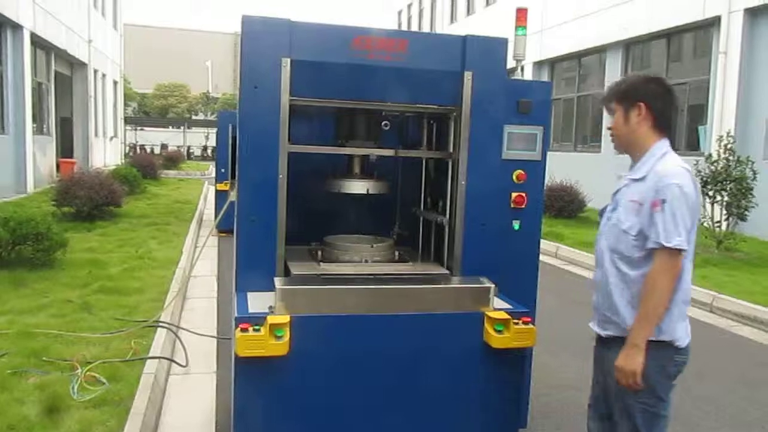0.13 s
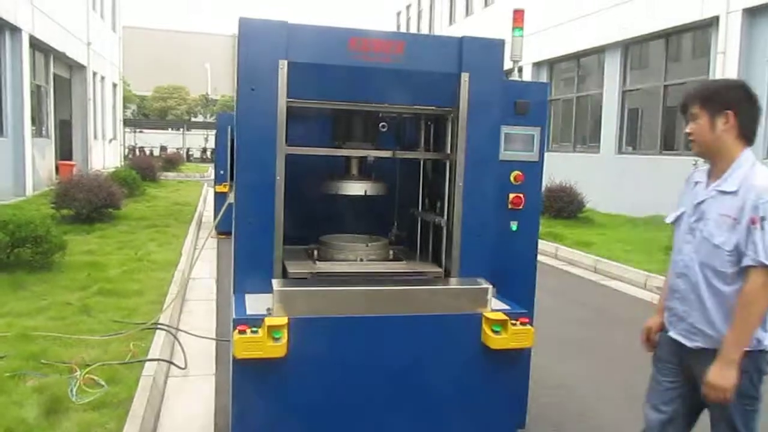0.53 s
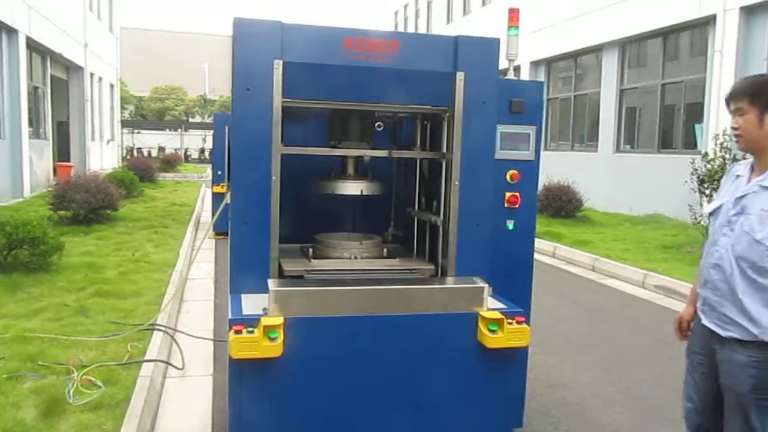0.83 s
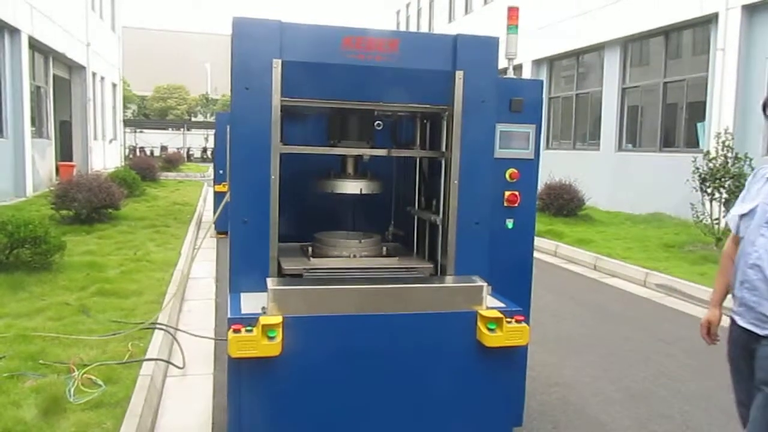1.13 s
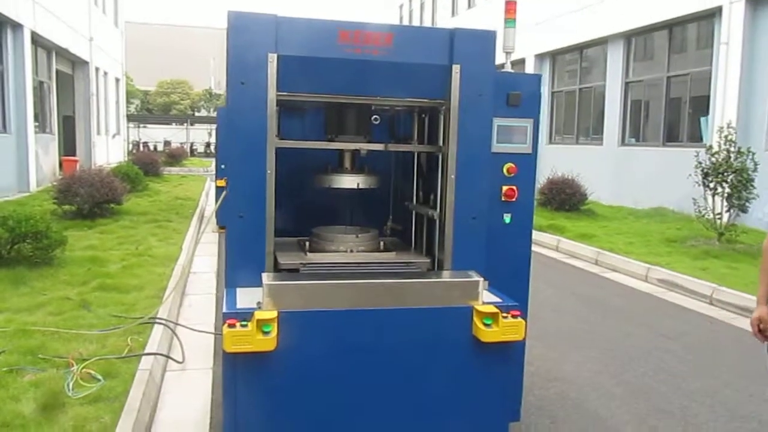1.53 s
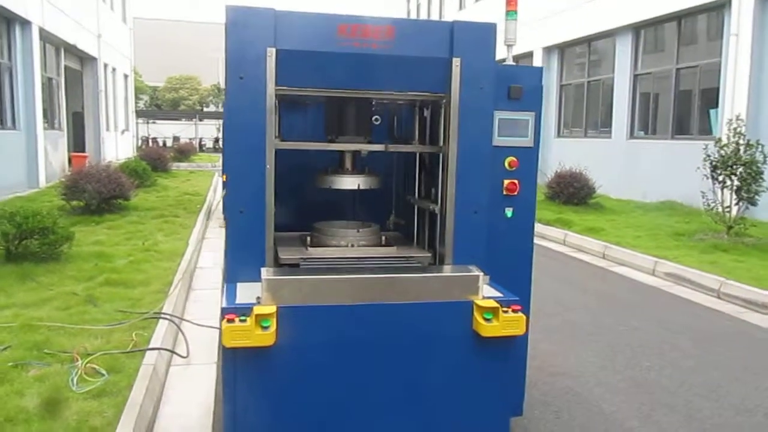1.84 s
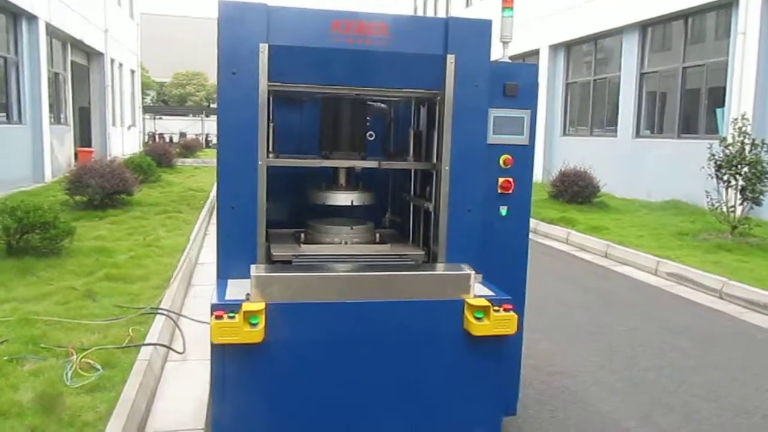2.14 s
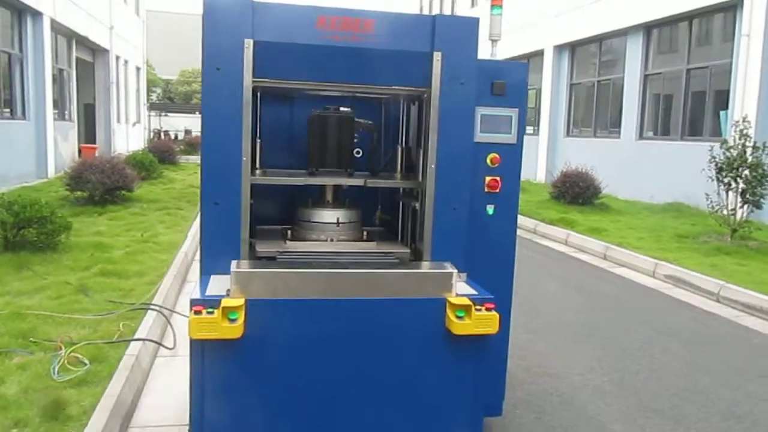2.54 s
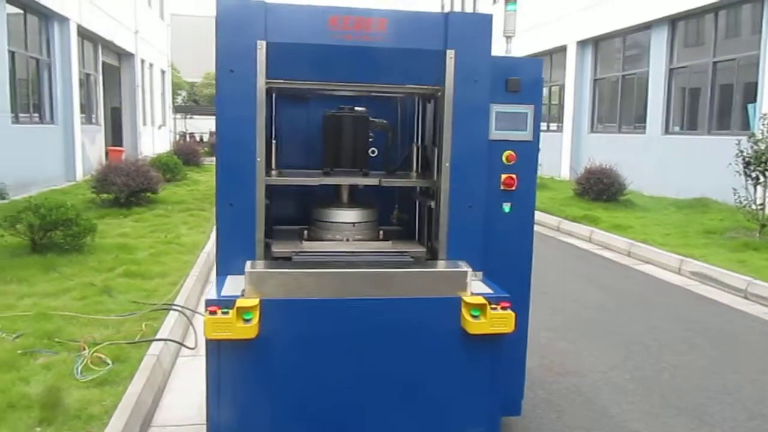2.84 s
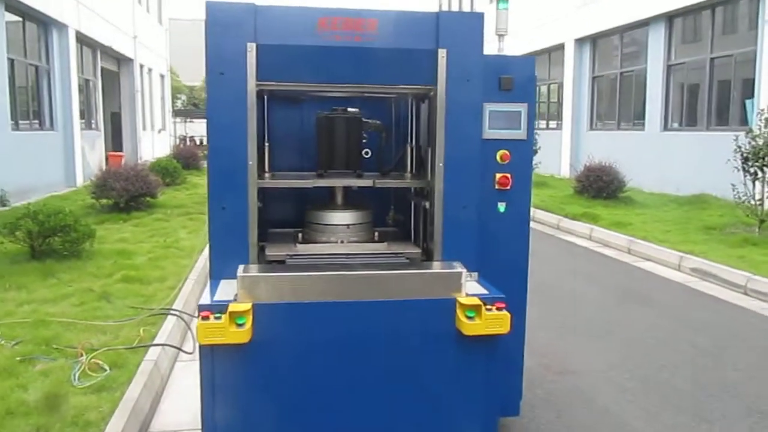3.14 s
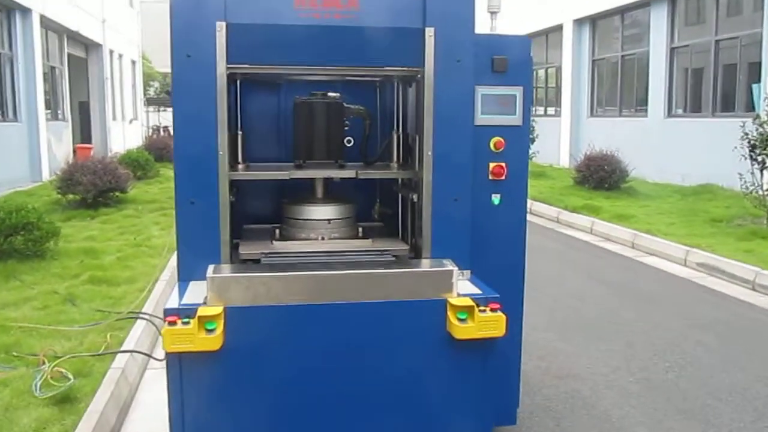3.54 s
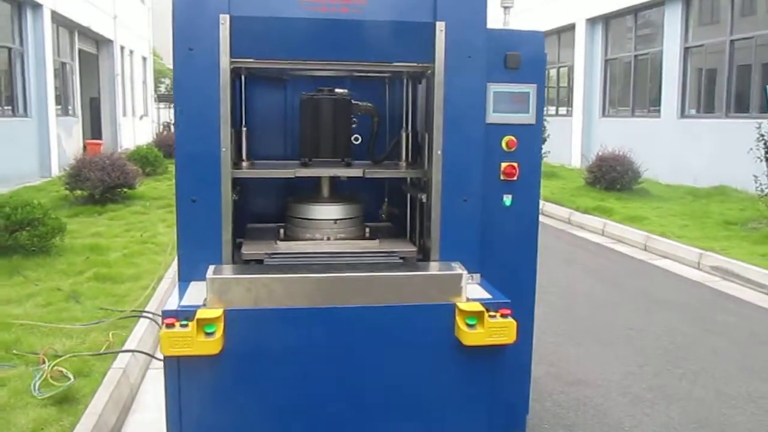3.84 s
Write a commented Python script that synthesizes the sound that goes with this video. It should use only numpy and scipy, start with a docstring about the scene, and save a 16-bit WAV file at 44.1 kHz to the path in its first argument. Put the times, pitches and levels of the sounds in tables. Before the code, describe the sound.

A pneumatic spin welder, close in stereo in a factory yard. After a tiny silence, metal clacks over bleeding air, loudest near 0.5 s, then fades to quiet. At 1.75 s a valve bursts into hiss and the head rumbles down, landing at 2.6 s with a chattering, ringing thud. From 2.95 s parts grind and groan as drone and high whine rise, then steady; a sharp tick at 3.54 s. Faint hum and wind beneath.

```python
"""A pneumatic spin welder runs a cycle in a factory yard, heard close up by a pair of microphones.
Its head rumbles down and lands with a chattering thud that rings the frame. Before that, metal parts clack
while air bleeds away, and a valve opens with a hiss. A servo then spins up: its drive whines in switching tones,
the parts rub as coloured noise until they soften, and the transmission drones in harmonics of its speed.
Behind it all lie the distant hum of the factory and a little wind on the microphones."""
import sys
import numpy as np
from scipy import signal
from scipy.fft import rfft, irfft
from scipy.io import wavfile

SR = 44100
rng = np.random.default_rng(int(sys.argv[2]) if len(sys.argv) > 2 else 0)


def write(x):
    x = np.atleast_2d(x).T
    wavfile.write(sys.argv[1], SR, np.round(np.clip(x, -1, 1) * 32767).astype(np.int16))


N = 176400
T = np.arange(N) / SR


def amp(db):
    """Decibels to gain."""
    return 10 ** (np.asarray(db) / 20)


def unit(x):
    """Scales to rms 1."""
    return x / np.sqrt(np.mean(abs(x) ** 2) + 1e-20)


def curve(points):
    """Joins (time [s], value) rows with straight lines."""
    return np.interp(T, *np.transpose(points))


def read(points, hz):
    """Reads (frequency [Hz], value) rows on a log axis."""
    f, value = np.transpose(points)
    return np.interp(np.log(hz + 1), np.log(f + 1), value)


# Likeness of the two microphones: (frequency [Hz], correlation [-1 to 1])
MIC_LIKENESS = [(30, .1), (60, .3), (130, 1), (290, 0.98), (1400, 1), (3100, 1), (6800, 0.85), (15000, .2)]


def noise(colour, ripple_db=2, ripple_hz=45):
    """Coloured noise of rms 1 with a random fine ripple in its spectrum, partly shared by the microphones."""
    hz = np.fft.rfftfreq(N, 1 / SR)
    common, difference = rfft(rng.standard_normal((2, N)))
    ripple = np.interp(hz / ripple_hz, np.arange(N), rng.standard_normal(N))
    ripple = ripple * hz / (hz + 500)  # smoother in the bass
    same = np.clip(read(MIC_LIKENESS, hz), -1, 1)
    mid = common * np.sqrt(1 + same)
    side = difference * np.sqrt(1 - same)
    gain = amp(read(colour, hz) + ripple_db * ripple)
    return unit(irfft(np.array([mid + side, mid - side]) * gain, N))


def drift(rate_hz):
    """Random motion of rms 1, mostly slower than the given rate."""
    hz = np.fft.rfftfreq(N // 10, 10 / SR)
    smooth = 1 / (1 + (hz / rate_hz) ** 4)
    slow = irfft(rfft(rng.standard_normal(N // 10)) * smooth, N // 10)
    return unit(np.interp(T, T[::10], slow))


def ring(hz, width_hz):
    """A resonance kept sounding by friction: a carrier whose size and phase wander, of rms 1."""
    wander = drift(width_hz / 2) + 1j * drift(width_hz / 2)
    return unit((wander * np.exp(2j * np.pi * hz * T)).real)


def rings(resonances):
    """Sums resonances given as (frequency [Hz], width [Hz], level [dB])."""
    return sum(amp(db) * ring(hz, width_hz) for hz, width_hz, db in resonances)


def tone(cycles):
    """A sine of rms 1 with a random start."""
    return np.sqrt(2) * np.sin(2 * np.pi * (cycles + rng.random()))


def strike(start, rise, t60):
    """Envelope of a blow: straight rise, then exponential decay by 60 dB in t60."""
    rising = np.clip((T - start) / rise, 0, 1)
    return rising * np.exp(-np.log(1000) * np.maximum(T - start - rise, 0) / t60)


# Rumble of the moving slide: (time [s], level [dB])
SLIDE_LEVEL = [(1.75, -36), (1.765, -26), (1.82, -31), (1.89, -25), (1.94, -29), (2.15, -33.5), (2.55, -31),
               (2.85, -31), (3.1, -45.5)]
# Spectrum of that rumble: (frequency [Hz], density [dB per Hz])
SLIDE_COLOUR = [(18, -67), (30, -31), (70, -1.5), (87, -5.5), (118, -12.5), (156, -6.5), (290, -2),
                (328, -7.5), (366, -3), (414, -9.5), (530, -14.5), (608, -9), (909, -15.5), (997, -15.5),
                (1200, -12), (1560, -29), (2640, -120)]
# Landing and rebounds of the head: (time [s], level [dB])
THUDS = [(2.572, -9.5), (2.583, -16), (2.594, -11), (2.619, -16.5), (2.640, -16), (2.669, -23),
         (2.693, -21), (2.714, -21.5), (2.746, -37)]
# Spectrum of the blows: (frequency [Hz], density [dB per Hz])
THUD_COLOUR = [(15, -70), (25, -42), (124, -21), (180, -10), (259, -1), (460, -11), (493, -16.5),
               (679, -7.5), (958, -16.5), (1030, -24), (1550, -22.5), (2630, -32.5), (3160, -30.5),
               (4060, -40), (6000, -46), (7800, -73), (13200, -120)]
# Frame modes rung by each blow: (frequency [Hz], level [dB], decay by 60 dB [s])
FRAME_MODES = [(218, -1.5, 0.23), (261, -3, 0.54), (286, -5, 0.24), (347, -8, .25), (384, -11, .2),
               (592, -8, 0.18), (666, -19, .15), (731, -6.5, 0.14), (1805, -21, 0.42)]
THUD_RISE_S, THUD_T60_S = 0.0028, 0.055
THUD_TAIL_DB, THUD_TAIL_T60_S = -12, 0.85


def head(judder_db=1.3, ring_db=-9):
    """The slide rumbles down; the head lands and rebounds, and each blow rings the frame."""
    slide = noise(SLIDE_COLOUR) * (T > VALVE_S) * amp(curve(SLIDE_LEVEL) + judder_db * drift(35))
    blows = np.zeros(N)
    for start, db in THUDS:
        blows[round(start * SR)] = amp(db)
    body = strike(0, THUD_RISE_S, THUD_T60_S)
    tail = amp(THUD_TAIL_DB) * strike(0, THUD_RISE_S, THUD_TAIL_T60_S)
    # Noise blows overlap by adding their powers
    power = abs(signal.fftconvolve(blows ** 2, body ** 2 + tail ** 2)[:N])
    thuds = noise(THUD_COLOUR) * np.sqrt(power)
    modes = sum(amp(ring_db + db) * strike(0, THUD_RISE_S, t60) * tone(hz * T)
                for hz, db, t60 in FRAME_MODES)
    return slide + thuds + signal.fftconvolve(blows, modes)[:N]


# Metal clacks: (time [s], level [dB], treble against the low part [dB], rise [s], decay by 60 dB [s])
CLACKS = [(.122, -33, -3, 0.027, 0.41), (0.175, -20.5, -10.5, 0.0068, .17), (0.272, -24.5, -13, .001, 0.14),
          (0.423, -21, -21, 0.0023, 0.29), (0.4958, -11, -3, 0.0065, 0.17), (.604, -33, -21, .003, 0.19),
          (0.627, -29.5, -4.5, 0.0052, 0.2), (.690, -34, -9, 0.0074, 0.19), (.9, -46, 4, .005, 0.16),
          (1.241, -41, 0, 0.0051, 0.24), (1.56, -48.5, 1, 0.0044, .1), (2.561, -26, 3.5, .01, 0.055)]
# Spectrum of the clacks: (frequency [Hz], density [dB per Hz])
CLACK_COLOUR = [(35, -45), (60, -7), (103, -10.5), (193, -14), (256, -14.5), (398, -3), (469, -23),
                (566, -2), (732, -10.5), (785, -0.5), (862, -10.5), (991, -2.5), (1200, -3), (1310, -11),
                (1440, -4.5), (2140, -7), (2350, -4.5), (2970, -4), (4030, -12), (6580, -7), (9790, -21.5),
                (13900, -65.5), (16000, -91)]
CLACK_TAIL_DB, CLACK_TAIL_T60_S = -14.5, 0.67
TREBLE_HZ = 3800


def clacks(grain_db=1.0):
    """Loose metal strikes home: sharp clatters of coloured noise, each with a faint longer tail."""
    body = noise(CLACK_COLOUR) * unit(amp(grain_db * drift(350)))
    low_pass = signal.butter(4, TREBLE_HZ, fs=SR, output="sos")
    low = signal.sosfiltfilt(low_pass, body)
    low_power, high_power = np.zeros((2, N))
    for start, db, treble_db, rise, t60 in CLACKS:
        blow = strike(start, rise, t60)
        tail = amp(CLACK_TAIL_DB) * strike(start, rise, CLACK_TAIL_T60_S)
        power = amp(db) ** 2 * (blow ** 2 + tail ** 2)
        low_power += power
        high_power += power * amp(treble_db) ** 2
    return low * np.sqrt(low_power) + (body - low) * np.sqrt(high_power)


# Air bleeding off: (time [s], level [dB])
BLEED_LEVEL = [(.07, -37), (.3, -34.5), (.48, -34), (.62, -44), (.8, -43.5), (1.1, -46.5), (1.4, -50),
               (1.75, -59.5), (4, -65)]
# Spectrum of the bleed: (frequency [Hz], density [dB per Hz])
BLEED_COLOUR = [(53, -37), (90, -11), (234, 0.5), (296, -0.5), (488, -11.5), (647, -4), (876, -13),
                (1680, -13), (2090, -19.5), (3080, -20), (4080, -27.5), (5530, -15.5), (6030, -13),
                (6720, -14.5), (10100, -22), (11300, -30), (12900, -30.5), (14400, -39), (16000, -59)]
# Blasts from the valve: (time [s], level [dB], rise [s], decay by 60 dB [s])
BLASTS = [(1.755, -20, 0.031, 0.29), (1.793, -21, 0.009, 0.27)]
# Spectrum of the blasts: (frequency [Hz], density [dB per Hz])
BLAST_COLOUR = [(350, -44), (600, -5), (1050, -3.5), (1370, -4), (1590, 4.5), (1980, -14), (2830, -2.5),
                (3160, 1.5), (4050, -11), (4980, 0), (6550, 0.5), (8990, -4.5), (9760, -8), (13900, -25),
                (16000, -49)]
# Spectrum of the exhaust on the down stroke: (frequency [Hz], density [dB per Hz])
EXHAUST_COLOUR = [(290, -40), (500, -11), (578, -23), (621, -8.5), (729, -13.5), (919, -18), (1020, -0.5),
                  (1090, -7), (1360, -3.5), (1460, -8), (1570, 2.5), (1690, -1.5), (1950, -5), (2330, 1),
                  (2540, -8), (3060, -3), (4090, -17), (5160, -5.5), (5970, -4), (8330, -9), (10200, -14),
                  (11100, -21.5), (13300, -27), (14900, -41), (16000, -50)]
VALVE_S, VALVE_RISE_S, LAND_S = 1.753, 0.0083, 2.575
EXHAUST_DB, EXHAUST_GROWTH_DB_PER_S = -29, 4
SHUT_T60_S, LEAK_DB, LEAK_T60_S = 0.095, -14, 3.7


def air(flutter_db=0.4):
    """Turbulent air as noise: a bleed, valve blasts, and an exhaust that shuts to a leak on landing."""
    after = np.maximum(T - LAND_S, 0)
    shutting = amp(-60 * after / SHUT_T60_S)
    leak = amp(LEAK_DB - 60 * after / LEAK_T60_S)
    flow = np.clip((T - VALVE_S) / VALVE_RISE_S, 0, 1) * np.minimum(shutting + leak, 1)
    stroke_s = np.minimum(T, LAND_S) - VALVE_S
    exhaust = noise(EXHAUST_COLOUR) * flow * amp(EXHAUST_DB + EXHAUST_GROWTH_DB_PER_S * stroke_s)
    blast_power = sum((amp(db) * strike(start, rise, t60)) ** 2 for start, db, rise, t60 in BLASTS)
    blast = noise(BLAST_COLOUR) * np.sqrt(blast_power)
    bleed = noise(BLEED_COLOUR) * amp(curve(BLEED_LEVEL))
    return (exhaust + blast + bleed) * amp(flutter_db * drift(28))


# Level of the drive's whine before its throb: (time [s], level [dB])
WHINE_LEVEL = [(0, -68), (1.2, -69.5), (2.62, -67), (2.72, -65), (2.85, -52.5), (2.955, -56), (2.97, -43),
               (3.12, -37.5), (3.25, -38), (3.36, -35), (3.52, -34.5), (3.56, -37.5), (4.0, -34)]
# Lines round the switching tone: (multiple of the pole rate, level when slow [dB], level at full speed [dB])
SIDEBANDS = [(-2, -35, -22), (-1, 1.5, -11.5), (0, 4, 6), (1, 7.5, -1.5), (2, -51, -17)]
# Lines round the upper switching tone: (multiple of half the pole rate, level [dB])
UPPER_SIDEBANDS = [(-11, -31), (-7, -48), (-5, -31), (-1, -18.5), (1, -37), (3, -24), (5, -42), (9, -41),
                   (13, -34)]
CARRIER_HZ, UPPER_HZ, POLES = 8005, 12008, 10
WHINE_WOBBLE, WHINE_THROB = .4, 0.19  # once a turn: phase swing [radians], depth [0-1]
WHINE_JITTER, UPPER_JITTER = 0.016, 0.17  # random phase flutter [cycles rms]


def whine(speed, turns):
    """The drive's switching tones; their sidebands fan out with speed and they throb once a turn."""
    share = speed / speed.max()
    angle = 2 * np.pi * turns
    cycles = CARRIER_HZ * T + WHINE_WOBBLE * np.sin(angle) / (2 * np.pi) + WHINE_JITTER * drift(660)
    lines = 0
    for k, slow_db, fast_db in SIDEBANDS:
        k = round(k)
        level = amp(slow_db + (fast_db - slow_db) * share ** 2)
        fade = np.minimum(speed, 1) if k else 1  # only the centre line sounds at rest
        lines = lines + level * fade * np.cos(2 * np.pi * (cycles + k * POLES * turns))
    upper = 0
    for k, db in UPPER_SIDEBANDS:
        flutter = UPPER_JITTER * drift(150)
        upper = upper + amp(db) * tone(UPPER_HZ * T + round(k) * POLES / 2 * turns + flutter)
    return (np.sqrt(2) * lines + upper) * amp(curve(WHINE_LEVEL)) * (1 + WHINE_THROB * np.cos(angle))


# Level of the drone before the speed scales it: (time [s], level [dB])
DRONE_LEVEL = [(2.95, -37), (3.15, -26), (3.3, -26.5), (3.4, -33), (3.48, -27), (3.59, -35), (3.65, -28.5),
               (3.73, -36), (3.83, -26.5), (3.91, -32.5), (4.0, -26)]
# Transmission harmonics: (multiple of the mesh rate, level [dB])
MESH_ORDERS = [(3, -16.5), (4, -20.5), (5, -19), (6, -11.5), (7, 0), (8, 1), (9, -12), (10, -15.5),
               (11, -25), (14, -18.5), (16, -15), (17, -23), (18, -23), (19, -13.5), (21, -29)]
# Frame resonances singing under the drone: (frequency [Hz], width [Hz], level [dB])
SINGING = [(733, 5.5, 0), (673, 71, -3.5), (530, 17, -10.5), (270, 9.1, -12.5)]
# Whirr of the turning spindle in the frame: (frequency [Hz], width [Hz], level [dB])
WHIRR = [(1646, 40, -54), (1780, 33, -48), (3050, 60, -57.5), (1379, 900, -51.5)]
MESH_PER_TURN = 7


def drone(speed, turns, jitter=0.032, waver_db=1.5, throb=0.13):
    """Transmission harmonics grow with speed and throb once a turn; the frame sings and whirrs along."""
    mesh = MESH_PER_TURN * turns
    lines = sum(amp(db + waver_db * drift(12)) * tone(round(k) * mesh + jitter * drift(25))
                for k, db in MESH_ORDERS)
    lines = lines * (1 + throb * np.cos(2 * np.pi * turns))
    growth = amp(curve(DRONE_LEVEL)) * (speed / speed.max()) ** 2
    return (lines + rings(SINGING)) * growth + rings(WHIRR) * np.minimum(speed, 1)


# Rubbing of the parts: (time [s], level [dB])
RUB_LEVEL = [(2.945, -29), (2.972, -20), (3.03, -23), (3.1, -26), (3.22, -25), (3.34, -33.5), (3.45, -38),
             (3.6, -43.5), (4.0, -41)]
# Spectrum of the rubbing: (frequency [Hz], density [dB per Hz])
RUB_COLOUR = [(18, -73), (30, -39), (75, -5.5), (123, -10.5), (148, -2), (191, -2), (321, -8.5),
              (384, -7.5), (487, -12), (698, -4), (886, -15.5), (1040, -14), (1150, -22.5), (1740, -30),
              (3500, -35), (4550, -71), (7700, -120)]
# Groaning resonances of the joint: (frequency [Hz], width [Hz], level [dB])
GROAN = [(583, 26, -26.5), (678, 69, -26), (473, 21, -39)]
# Spectrum of the light scrape: (frequency [Hz], density [dB per Hz])
SCRAPE_COLOUR = [(500, -9), (900, -2.5), (1090, -13.5), (1250, -8), (1700, -3.5), (2040, -11.5), (2370, -8),
                 (3620, -27), (5700, -21.5), (7400, -35), (9600, -49), (16000, -92)]
# Thin squeal that comes and goes: (time [s], level [dB])
SQUEAL_LEVEL = [(3.15, -62), (3.26, -48.5), (3.39, -57), (3.48, -41), (3.53, -64), (3.61, -55),
                (3.66, -46.5), (3.73, -55), (3.78, -54), (3.9, -62)]
GROAN_S, GROAN_WIDTH_S = 3.244, 0.13
SCRAPE_S, SCRAPE_DB = 2.95, -36.5
SQUEAL_HZ, SQUEAL_WAVER_HZ = 5080, 9.8


def rubbing(grain_db=1.4, scrape_grain_db=1.5):
    """The parts grind, groan as the speed rises, and settle to a light scrape and squeal as they soften."""
    grind = noise(RUB_COLOUR) * amp(curve(RUB_LEVEL) + grain_db * drift(110))
    groan = rings(GROAN) * np.exp(-.5 * ((T - GROAN_S) / GROAN_WIDTH_S) ** 2)
    scrape = noise(SCRAPE_COLOUR) * amp(SCRAPE_DB + scrape_grain_db * drift(90))
    squeal_cycles = np.cumsum(SQUEAL_HZ + SQUEAL_WAVER_HZ * drift(30)) / SR
    squeal = tone(squeal_cycles) * amp(curve(SQUEAL_LEVEL))
    contact = np.clip((T - SCRAPE_S) / 0.011, 0, 1)
    return (grind + groan + scrape + squeal) * contact


# Spectrum of the tick: (frequency [Hz], density [dB per Hz])
TICK_COLOUR = [(500, -33), (1400, 0), (2200, 7), (3200, -13), (4000, -12), (4700, 0), (5400, 8.5),
               (6400, -2.5), (7500, -18), (9200, 3), (11300, 3), (14000, -11), (16000, -18)]
TICK_S, TICK_DB, TICK_T60_S = 3.5398, -7, .005


def tick(rise_s=0.00053):
    """One sharp, dry tick: a very short noise burst, the same at both microphones."""
    return unit(noise(TICK_COLOUR)[0]) * amp(TICK_DB) * strike(TICK_S, rise_s, TICK_T60_S)


# Spectrum of the distant factory: (frequency [Hz], density [dB per Hz])
YARD_COLOUR = [(15, -42), (25, -16), (76, -1), (224, -12), (313, -5), (350, -10.5), (391, -1), (477, -6),
               (582, -0.5), (650, -15), (711, -9), (1350, -13.5), (1730, -15), (2110, -18), (3210, -22),
               (3920, -32), (5000, -25.5), (6500, -53), (11000, -120)]
# Spectrum of light wind on the microphones: (frequency [Hz], density [dB per Hz])
WIND_COLOUR = [(15, -31), (30, -17), (50, -16), (70, -3), (120, -19), (250, -10), (1000, -59)]
YARD_DB, WIND_DB = -44, -45


def yard():
    """Distant factory hum as steady noise, and a little wind that differs at each microphone."""
    wind = np.array([noise(WIND_COLOUR)[0], noise(WIND_COLOUR)[1]])
    return amp(YARD_DB) * noise(YARD_COLOUR) + amp(WIND_DB) * wind


# Spindle speed: (time [s], speed [turns per s])
SPINDLE_SPEED = [(2.62, 0), (2.85, 3.7), (3.0, 6.5), (3.1, 8.5), (3.2, 10.4), (3.3, 11.9), (3.4, 12.5),
                 (3.6, 12.6), (4.0, 12.68)]


def scene():
    """The machine at work in the yard; whine and drone follow one spindle."""
    speed = curve(SPINDLE_SPEED)
    turns = np.cumsum(speed) / SR
    machine = head() + clacks() + air() + whine(speed, turns) + drone(speed, turns)
    return machine + rubbing() + tick() + yard()


# Level balance of the microphone pair: (frequency [Hz], left minus right [dB])
MIC_BALANCE = [(100, 0), (2500, -.2), (4400, .3), (6500, .5), (8100, 3.7), (10500, -3), (15000, -6.5)]
# Phase between the microphones: (frequency [Hz], lead of the right [radians])
MIC_LEAD = [(100, 0), (4300, 0.22), (5600, 0.6), (8000, 0.43), (10500, 2.06), (15000, 0.32)]
LOW_CUT_HZ, EDGE_HZ, START_S = 48, 15800, .074


def record(dry):
    """Two close microphone ports that differ in the treble, a bass cut, a silent lead-in, a band limit."""
    hz = np.fft.rfftfreq(N, 1 / SR)
    sides = np.array([[.5], [-.5]])  # left, right
    ports = amp(sides * read(MIC_BALANCE, hz)) * np.exp(-1j * sides * read(MIC_LEAD, hz))
    low_cut = (1j * hz / (1j * hz + LOW_CUT_HZ)) ** 2
    heard = irfft(rfft(dry) * ports * low_cut, N) * (T > START_S)
    band_limit = signal.firwin(511, EDGE_HZ, window=("kaiser", 9), fs=SR)
    return signal.oaconvolve(heard, band_limit[None], "same")


dry = scene()
out = record(dry)
write(out)
```